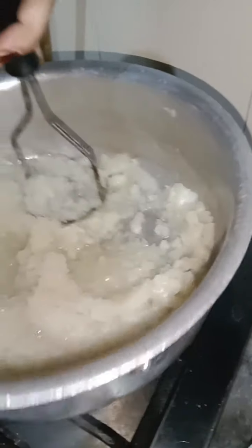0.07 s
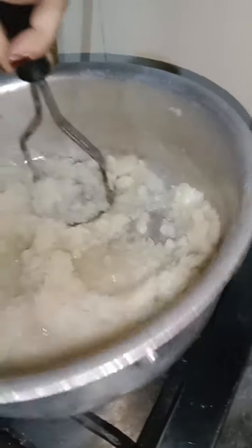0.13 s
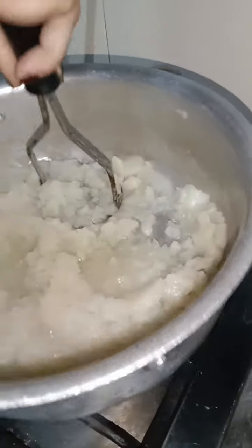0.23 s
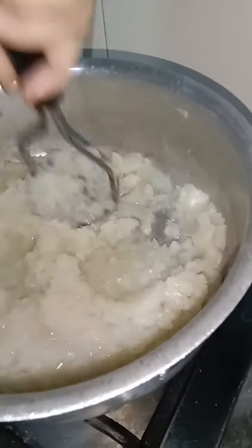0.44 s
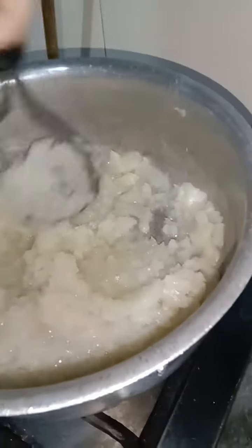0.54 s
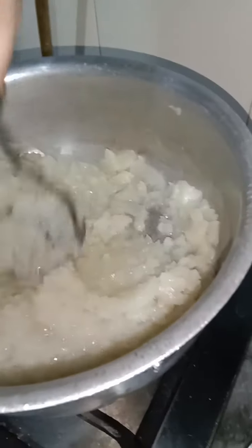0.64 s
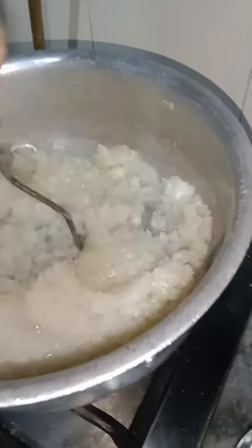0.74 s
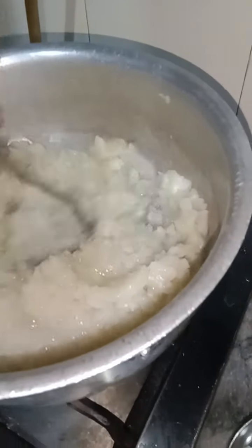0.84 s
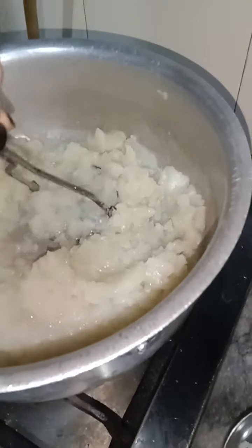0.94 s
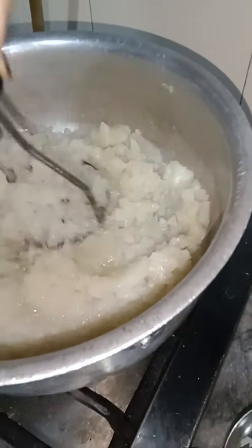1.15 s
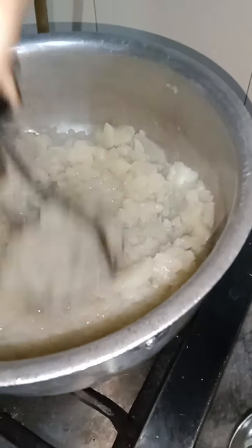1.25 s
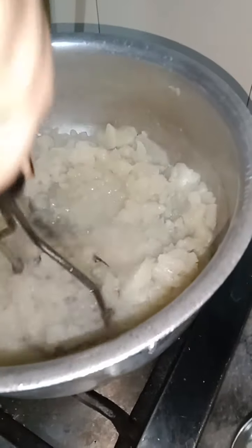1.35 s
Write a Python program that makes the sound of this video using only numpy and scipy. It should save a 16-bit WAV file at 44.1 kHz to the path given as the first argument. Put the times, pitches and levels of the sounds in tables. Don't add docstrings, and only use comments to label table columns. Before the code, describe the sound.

A wire masher in a metal pot of wet mash, heard close on a phone. The rim's wavering ring from an earlier knock fades over faint hiss. At 0.2 s dull thuds, grinding and a light clack begin; at 0.4 s comes the loudest thud and bright clank, with a short metallic ring. Scraping fades by 0.65 s. Soft thuds and wet squelches follow from 0.8 to 1.1 s, then near quiet.

```python
import sys
import numpy as np
from scipy import signal
from scipy.fft import rfft, irfft
from scipy.io import wavfile
from scipy.ndimage import uniform_filter1d

SR = 44100
rng = np.random.default_rng(int(sys.argv[2]) if len(sys.argv) > 2 else 0)


def undo_db(level):
    steps = np.asarray(level, float) / 20
    return 10 ** steps


def store_wav(level_fs):
    pcm = np.round(np.clip(np.atleast_2d(level_fs), -1, 1) * 32767)
    wavfile.write(sys.argv[1], SR, pcm.T.astype(np.int16))


N = 61739
T = np.arange(N) / SR
SHELF_HZ = 3834


def rms_one(x):
    return x / np.sqrt(np.mean(x ** 2) + 1e-20)


def follow(table):
    times, *columns = np.transpose(table)
    return [np.interp(T, times, column) for column in columns]


def band_pass(x, order, edges_hz):
    return signal.sosfilt(signal.butter(order, edges_hz, "band", fs=SR, output="sos"), x)


def drift(rate_hz):
    pole = np.exp(-2 * np.pi * rate_hz / SR)
    noise = rng.standard_normal(N + SR // 2)
    return rms_one(signal.lfilter([1], [1, -2 * pole, pole * pole], noise)[SR // 2:])


def ring(x, hz, t60):
    radius, angle = undo_db(-60 / (t60 * SR)), 2 * np.pi * hz / SR
    return signal.lfilter([0, np.sin(angle)], [1, -2 * radius * np.cos(angle), radius ** 2], x + 1e-18)


def coloured(x, points):
    hz, db = np.transpose(points)
    f = np.fft.rfftfreq(N, 1 / SR) + 1
    gain = undo_db(np.interp(np.log(f), np.log(hz), db))
    return rms_one(irfft(rfft(x) * gain, N))


def grains(rate_per_s, spread_db):
    size = undo_db(spread_db * np.minimum(rng.exponential(1, N), 4.0)) * rng.choice([-1, 1], N)
    return size * (rng.random(N) < rate_per_s / SR)


def patchy(x):
    edges = np.minimum(500 * 2 ** (np.arange(16) / 3), 0.45 * SR)
    out = np.zeros(N)
    for k, pair in enumerate(zip(edges, edges[1:])):
        swell = undo_db(3 * drift(14))
        out += band_pass(x, 2, pair) * swell * (-1) ** k
    return rms_one(out)


def tail(spectrum, envelope):
    noise = patchy(coloured(rng.standard_normal(N), spectrum))
    mid = signal.sosfiltfilt(signal.butter(6, SHELF_HZ, fs=SR, output="sos"), noise)
    return envelope(1.6) * mid + envelope(1) * (noise - mid)


def suppressor(pauses):
    shut_s = 0.017
    db = sum(depth * np.clip((T - shut) / shut_s, 0, 1) * (T < reopen) for shut, reopen, depth in pauses)
    return undo_db(uniform_filter1d(db, size=130))


def hiss():
    # (centre [Hz], width [Hz], level [dB])
    hiss_bands = [(899, 100, -72.5), (2553, 270, -87.5), (3256, 130, -87), (3996, 99, -72.5),
                  (4240, 98.8, -77), (5320, 420, -76), (6580, 240, -75.5), (6550, 180, -71),
                  (7730, 200, -66), (8830, 480, -74.5), (10220, 450, -71), (11520, 650, -81),
                  (13800, 1900, -80.5), (15400, 600, -82.5)]
    # (lower edge [Hz], upper edge [Hz])
    gap_hz = [3480, 3800]
    flicker_db, fade_db_per_s = 1.3, -4
    out = np.zeros(N)
    for hz, width, db in hiss_bands:
        band = band_pass(rng.standard_normal(N), 2, [hz - width / 2, hz + width / 2])
        low_fade_db = (hz < SHELF_HZ) * 12 * (np.maximum(T, 0.62) - 1.3)
        out += undo_db(db + flicker_db * drift(10) - low_fade_db) * rms_one(band)
    shelf_filter = signal.cheby2(8, 40, [SHELF_HZ - 150, 11800], "band", fs=SR, output="sos")
    shelf = signal.sosfilt(shelf_filter, rng.standard_normal(N))
    out = (out + undo_db(-84.5) * shelf) * undo_db(fade_db_per_s * (T - 3.0))
    out += undo_db(-89.5) * rng.standard_normal(N)
    return signal.sosfilt(signal.butter(2, gap_hz, "bandstop", fs=SR, output="sos"), out)


def rim_wash():
    # (frequency [Hz], density [dB per Hz])
    spectrum = [(500, 8), (3000, 2), (3700, -3), (5400, -4), (8500, -9), (9500, -20), (12000, -40.5)]
    level_db, t60_s = -30.5, 0.65
    return tail(spectrum, lambda speed: undo_db(level_db - 60 * speed * T / t60_s))


def rim():
    # (frequency [Hz], level [dB], t60 [s], beat [Hz], first swell [s])
    rim_modes = [(250.3, -33.5, 1.2, 4.9, .07), (709, -30.5, 0.38, 10, .015), (1364, -28.5, 0.29, 11, .06),
                 (2064, -28, .4, 6.7, 0.088), (2754, -35, 0.41, 9.5, 0.065), (1050, -44.5, .3, 10, 0.023),
                 (2887, -49, 0.27, 18, 0.031), (3380, -33, 0.09, 44, 0.015), (2050, -37.5, .25, 38, 0.035),
                 (5520, -36, .15, 99, 0.034)]
    partner, rough = 0.6, 0.22
    out = np.zeros(N)
    for hz, db, t60, beat_hz, swell_s in rim_modes:
        beat = partner * np.exp(2j * np.pi * beat_hz * (T - swell_s))
        wobble = rough * (drift(24.08) + 1j * drift(25))
        line = np.exp(2j * np.pi * (hz * T + rng.random()))
        out += undo_db(db - 60 * T / t60) * np.real((1 + beat + wobble) * line)
    return out


def narrow_swells():
    middle_s = [.327, .83, .9, .922, .997, 1.011, 1.005, 1.1, 1.31, .77, 1.089, .463, .922, 1.25, .69, .61,
                .87, 1.15, .84, .208, .96, 1.0, 1.15, .49]
    # (length [s], frequency [Hz], level [dB])
    swell_tones = [(0.016, 1494, -40.5), (0.11, 2460, -61), (0.13, 717, -57.5), (0.043, 2000, -58),
                   (0.057, 1870, -52.5), (0.08, 2280, -56.5), (0.063, 1050, -52), (0.14, 2396, -72.5),
                   (0.12, 3300, -74), (0.086, 130, -73), (0.063, 205, -65), (.04, 1500, -33.5),
                   (0.036, 3350, -52.5), (0.19, 105, -62.5), (0.073, 260, -60.5), (0.067, 2300, -59.5),
                   (0.11, 3300, -64.5), (.2, 2600, -72), (0.078, 2500, -57), (0.037, 900, -33),
                   (0.088, 410, -60.5), (0.092, 200, -50.5), (0.071, 2800, -70.5), (0.062, 1100, -40)]
    ring_cycles = 55
    out = np.zeros(N)
    for t, (length, hz, db) in zip(middle_s, swell_tones):
        swell = np.cos(np.pi * np.clip((T - t) / length, -0.5, 0.5)) ** 2
        t60 = ring_cycles / hz
        tone = ring(ring(rng.standard_normal(N), hz, t60), hz, t60)
        out += undo_db(db) * np.sqrt(np.mean(swell ** 2)) * rms_one(swell * tone)
    return out


def squelch():
    # (time [s], level [dB], share of fine bright spray [0-1])
    motion = [(0, -73, 0.4), (.19, -84, 0.9), (.22, -42, 0.45), (.38, -50, 1), (.45, -72, 0.33),
              (.6, -49, .7), (.67, -72.5, .9), (.762, -57.5, .9), (.78, -48, 1), (.81, -51.5, 0.6),
              (.87, -47, 0.7), (.925, -53, 1), (.945, -59, 0.3), (.962, -53, 0.74), (.975, -44.5, .3),
              (1.01, -46, 0.05), (1.05, -53.5, 0.57), (1.09, -68, 0.9)]
    # (frequency [Hz], density [dB per Hz])
    wet_colour = [(350, -63), (600, -23), (706, 1), (1060, -1), (1690, -7.5), (1880, -12.5), (2750, -6),
                  (7640, -10), (15500, -32)]
    # (frequency [Hz], density [dB per Hz])
    spray_colour = [(1500, -27), (2600, -7.5), (3600, -12.5), (4100, 1.5), (6500, -2), (9000, -5.5),
                    (15500, -25.5)]
    db, share = follow(motion)
    full = coloured(grains(9000, 2.0), wet_colour)
    fine = coloured(grains(12000, 2.0), spray_colour)
    return undo_db(db + 0.6 * drift(40)) * patchy((1 - share) * full + share * fine)


def pings():
    # (time [s], level [dB], quick t60 [s])
    loop_blows = [
        (.4255, -20, 0.14),
        (.914, -62, 0.079),
    ]
    loop_hz, linger_db, linger_t60_s = 3385, -15, 0.45
    quick, clicks = np.zeros((2, N))
    for t, db, t60 in loop_blows:
        click = (np.arange(N) == int(t * SR)) * undo_db(db)
        quick += ring(click, loop_hz, t60) + 0.13 * ring(click, loop_hz - 110, 0.4 * t60)
        clicks += click
    slow = ring(clicks, loop_hz - 8, linger_t60_s) + 1.2 * ring(clicks, loop_hz - 50, linger_t60_s)
    return quick + undo_db(linger_db) * slow


def snaps():
    # (time [s], level [dB], fade [s])
    bursts = [
        (0, -53, .05),
        (0.2359, -27, .006),
        (0.3976, -20.5, .007),
        (.4255, -31, .012),
    ]
    # (frequency [Hz], density [dB per Hz])
    snap_colour = [(1500, -30.5), (2600, -3.5), (3800, -7.5), (5500, 0), (7000, 0.5), (8800, -5),
                   (9600, -14.5), (15500, -32)]
    level = sum((T >= t) * undo_db(db) * np.exp(-np.abs(T - t) / fade) for t, db, fade in bursts)
    return coloured(rng.standard_normal(N), snap_colour) * level


def clacks():
    # (frequency [Hz], level [dB], t60 [s])
    wire_modes = [(2337, -8.5, 0.092), (2943, 2, 0.052), (3900, -21.5, 0.03), (4680, -16, 0.035),
                  (5424, -7.5, 0.035), (5730, -4, 0.025), (6850, 0.5, 0.029), (7100, -5, 0.0089),
                  (6750, -22.5, 0.045), (7900, -10, 0.038), (8710, -11, 0.034), (10000, -20, 0.03),
                  (11170, -37.5, .04)]
    # (time [s], level [dB], chatter [s], tilt [dB per octave])
    clack_hits = [
        (.198, -42, 0.0034, -3.5),
        (0.2366, -30.5, 0.0037, 1.5),
        (0.292, -44.5, 0.0031, 2),
        (0.311, -45.5, 0.0028, -7.5),
        (0.399, -12.5, 0.0042, 5),
        (0.405, -23.5, .009, -1.5),
        (.425, -24, 0.007, 3.5),
        (0.779, -57, 0.0067, 23),
        (0.916, -62, 0.0059, 0),
    ]
    # (frequency [Hz], density [dB per Hz])
    wash_colour = [(710, -17), (1200, -4), (2260, -7), (2590, -8.5), (3350, -5.5), (5090, -19),
                   (6730, -11.5), (15500, -42.5)]
    wash_db, wash_t60_s, crack_db, crack_s = -14, 0.5, 0.5, 0.0057
    chatter_noise = grains(5000, 2.0)
    out = np.zeros(N)
    for t, db, chatter_s, tilt in clack_hits:
        drive = (T >= t) * np.exp(-np.maximum(T - t, 0) / chatter_s) * chatter_noise
        drive *= 1.25 * undo_db(db) / np.sqrt(np.sum(drive ** 2))
        drive[int(t * SR)] += 0.5 * undo_db(db)
        for hz, level_db, t60 in wire_modes:
            luck_db = rng.standard_normal()
            gain = undo_db(level_db + tilt * np.log2(hz / 5000) + luck_db)
            out += gain * ring(drive, hz, t60) * np.sign(luck_db)

    def envelope(speed):
        level = np.zeros(N)
        for t, db, *_ in clack_hits:
            since = np.abs(T - t)
            wash = undo_db(db + wash_db - 60 * speed * since / wash_t60_s)
            crack = undo_db(db + crack_db) * np.exp(-since / crack_s)
            level += (T >= t) * (wash + crack)
        return level

    return out + tail(wash_colour, envelope)


def bottom():
    mode_hz = [71, 112, 155, 207, 260, 310, 367, 464, 554, 690, 795, 1060, 1330, 1723]
    # (level [dB], t60 [s])
    mode_decay = [(-12.5, 0.11), (-29.5, 0.98), (-37.5, 0.05), (-27, 0.59), (-24, 0.18), (-12, 0.074),
                  (-8, 0.13), (-15, 0.13), (-16.5, 0.064), (-12.5, 0.068), (-6, 0.049), (-4.5, .05),
                  (-14.5, 0.048), (-15, 0.077)]
    # (time [s], level [dB], contact cut-off [Hz], thump [Hz], thump t60 [s])
    thud_hits = [(0.197, -16.5, 620, 410, 0.028), (.204, -21.5, 940, 302, 0.091),
                 (0.2253, -22.5, 610, 265.4, 0.14), (.24, -27.5, 700, 330, 0.036),
                 (.249, -28, 603, 264, 0.072), (.268, -31, 610, 298, 0.028), (0.2934, -16, 600, 320, 0.027),
                 (.308, -26.5, 700, 430, .04), (0.34, -29, 400, 202, .04), (.399, -12.5, 970, 290, 0.034),
                 (0.4065, -7, 706, 345, 0.034), (0.4262, -17, 810, 291, 0.076), (.435, -30, 710, 365, .08),
                 (.445, -12, 616, 366, .08), (0.473, -26, 595, 253, 0.038), (.5, -31, 1204, 387, 0.031),
                 (0.55, -23, 633, 351, 0.052), (.575, -36, 500, 203, 0.043), (0.602, -32, 505, 304, 0.045),
                 (0.813, -31.5, 450, 290, 0.087), (0.845, -31, 440, 296.6, 0.22),
                 (0.857, -36, 450, 317, .08), (0.872, -38, 414, 257, 0.049), (.893, -40.5, 402, 215, 0.087),
                 (0.995, -37, 506.5, 387, 0.063), (1.008, -42.5, 700, 198, 0.23),
                 (1.018, -37.5, 451, 301.5, 0.1)]
    # (time [s], level [dB], contact cut-off [Hz])
    pressure = [(0, -38.5, 484), (.194, -59, 480), (.205, -24.5, 1340), (.29, -26.5, 1400),
                (.397, -34.5, 960), (.41, -12.5, 1700), (.47, -21, 1580), (.54, -27, 1570),
                (.63, -34, 1210), (.665, -43.5, 406), (.808, -77.5, 294), (.815, -39.5, 330),
                (.92, -48, 452), (.96, -51, 416), (1.01, -43.5, 438), (1.06, -67, 320),
                (1.12, -66.5, 300.3), (1.4, -86, 294)]
    db, cut_hz = follow(pressure)
    contacts = grains(1500, 2.5)
    soft, hard = (rms_one(signal.sosfilt(signal.butter(4, hz, fs=SR, output="sos"), contacts))
                  for hz in (400, 1600))
    share = np.clip(np.log(cut_hz / 300) / np.log(2000 / 300), 0, 1)
    grind = undo_db(db) * ((1 - share) * soft + share * hard)

    blows, thumps = np.zeros((2, N))
    for t, hit_db, contact_hz, thump_hz, thump_t60 in thud_hits:
        push = np.hanning(int(SR / contact_hz))
        blow = np.zeros(N)
        blow[int(t * SR):][:len(push)] = -undo_db(hit_db) * push / push.sum()
        blows += blow
        thumps += ring(blow, thump_hz, thump_t60)

    modes = np.zeros(N)
    for hz, (level_db, t60) in zip(mode_hz, mode_decay):
        modes += undo_db(level_db) * (ring(blows, hz, t60) + 0.024 * ring(grind, hz, t60 * 0.33))
    return modes + 0.046 * grind + undo_db(1) * thumps


def scene():
    # (shuts [s], reopens [s], depth [dB])
    low_pauses = [
        (.635, .808, -14),
        (.715, .808, -2),
        (.928, .985, -11),
        (1.085, 1.5, -15),
    ]
    # (shuts [s], reopens [s], depth [dB])
    mid_pauses = [
        (.13, .193, -4),
        (.335, .396, -5),
        (.56, .76, -3),
        (.8, .905, -3),
        (1.06, 1.5, -2.5),
        (.935, .965, -5),
    ]
    low_gain = suppressor(low_pauses)
    hiss_follows = 0.3
    noisy = hiss() * low_gain ** hiss_follows + rim_wash() + squelch() + snaps() + clacks()
    tonal = rim() + narrow_swells() + pings() + bottom() * low_gain
    mid_filter = signal.butter(4, [1400, SHELF_HZ], "band", fs=SR, output="sos")
    mid = signal.sosfiltfilt(mid_filter, noisy)
    return (tonal + noisy - mid * (1 - suppressor(mid_pauses)))[None]


def roll_off(x):
    return signal.sosfilt(signal.butter(12, 15650, fs=SR, output="sos"), x)


def record(dry):
    low_cut_hz, top_cut_hz = 64, 15750
    x = signal.sosfilt(signal.butter(9, low_cut_hz, "high", fs=SR, output="sos"), dry)
    x = 1.023 * np.tanh(x / 1.396)
    x = signal.sosfilt(signal.cheby2(12, 40, top_cut_hz, fs=SR, output="sos"), x)
    return roll_off(x)


dry = scene()
out = record(dry)
store_wav(out)
```